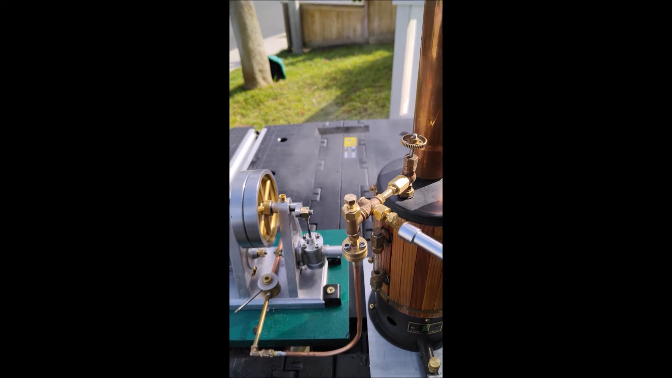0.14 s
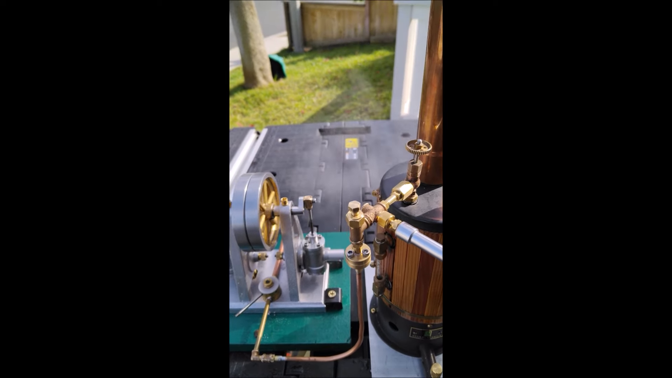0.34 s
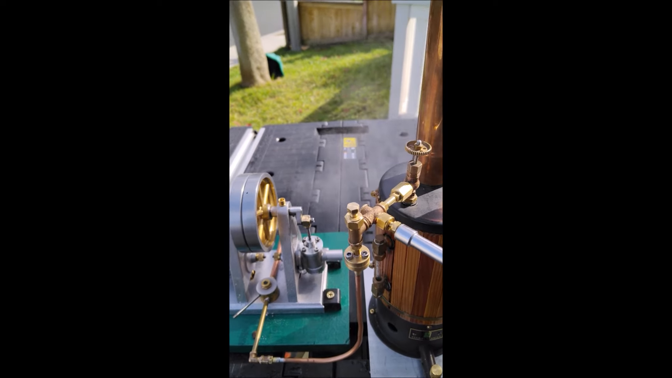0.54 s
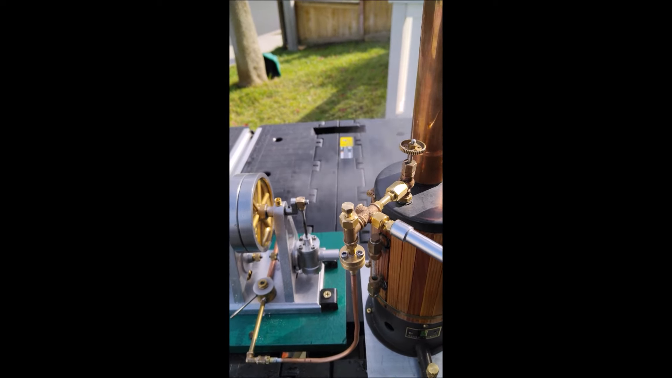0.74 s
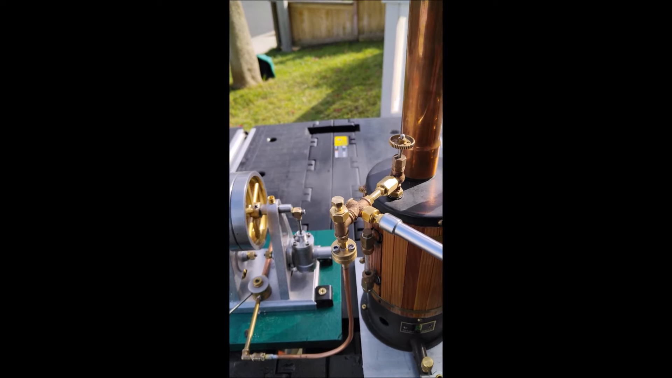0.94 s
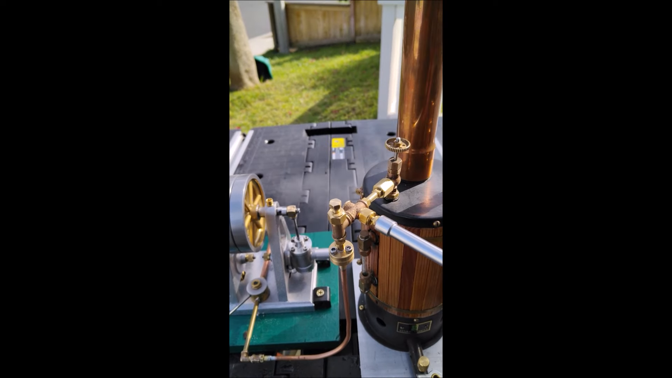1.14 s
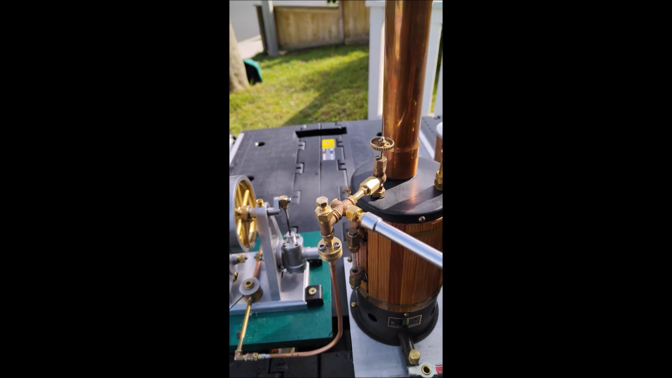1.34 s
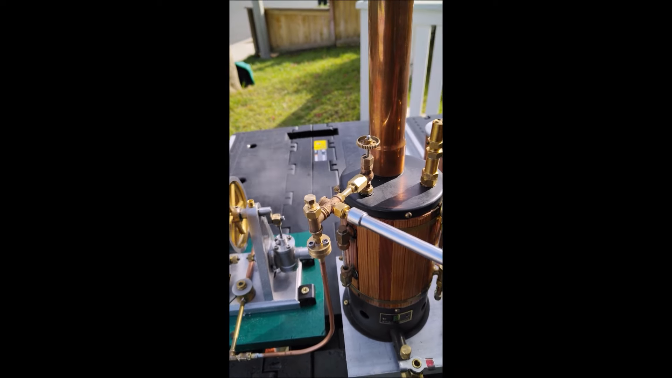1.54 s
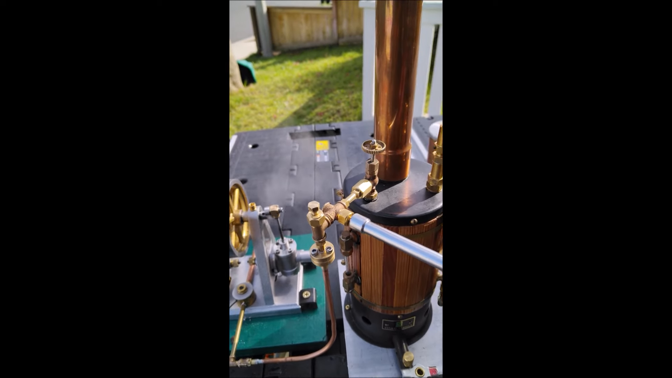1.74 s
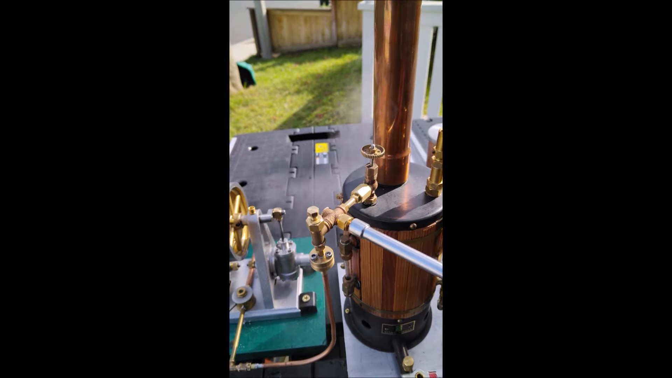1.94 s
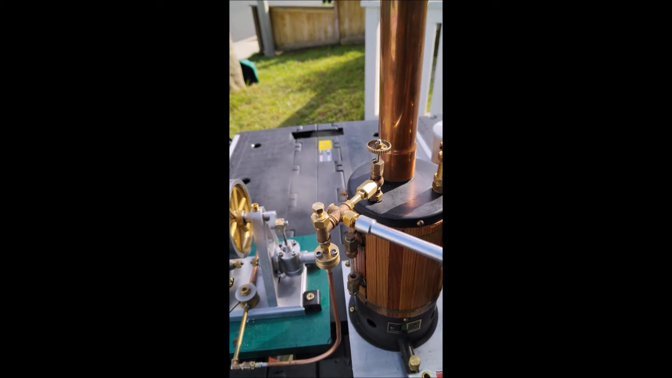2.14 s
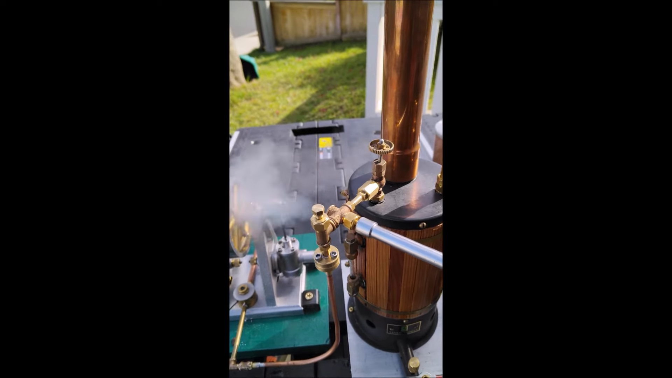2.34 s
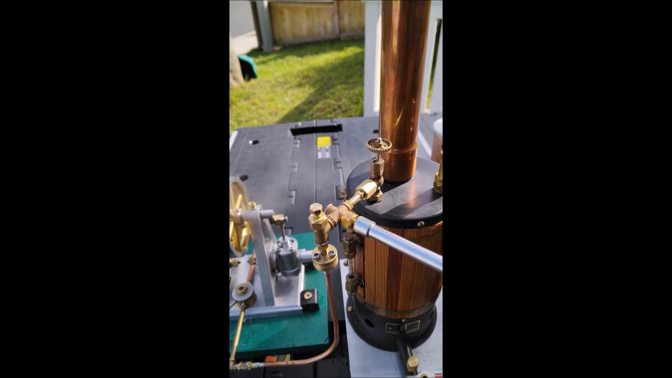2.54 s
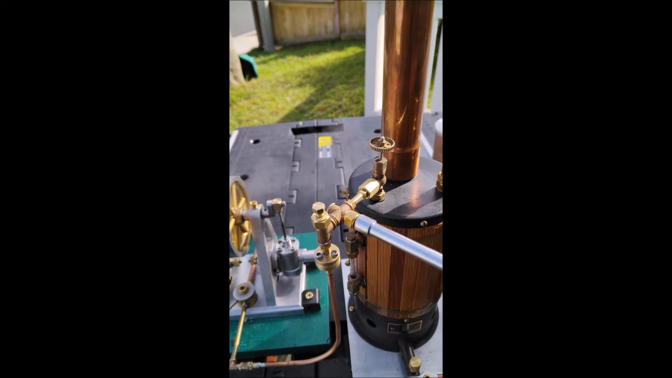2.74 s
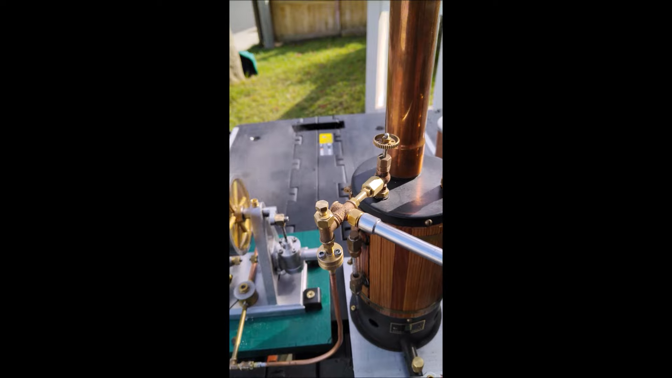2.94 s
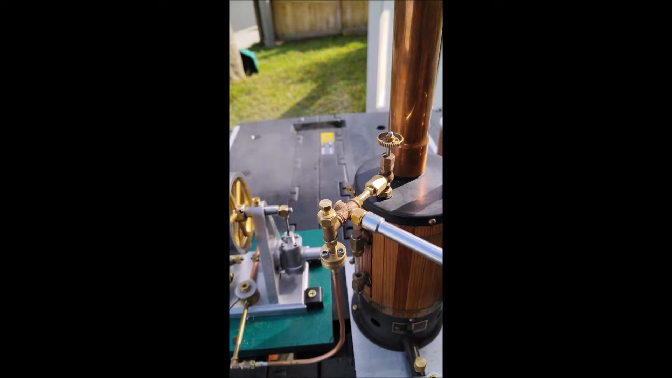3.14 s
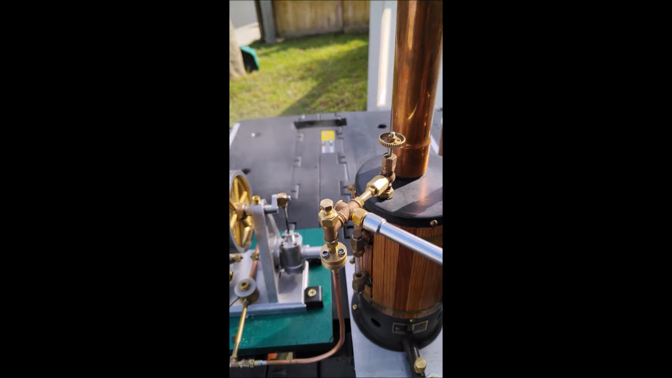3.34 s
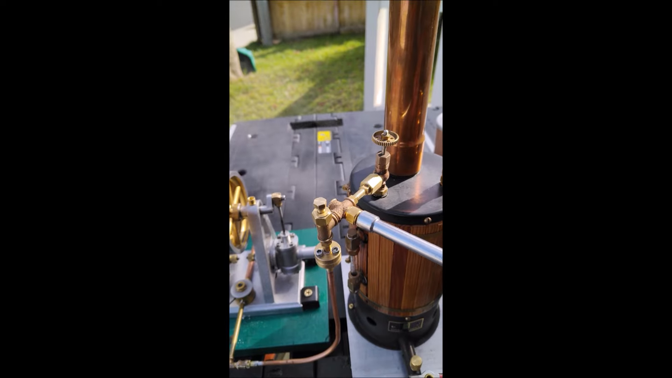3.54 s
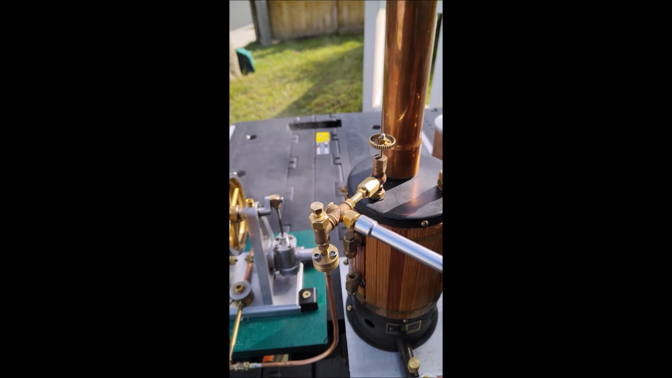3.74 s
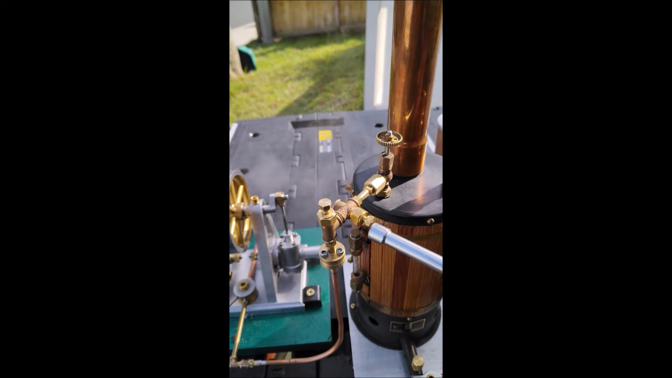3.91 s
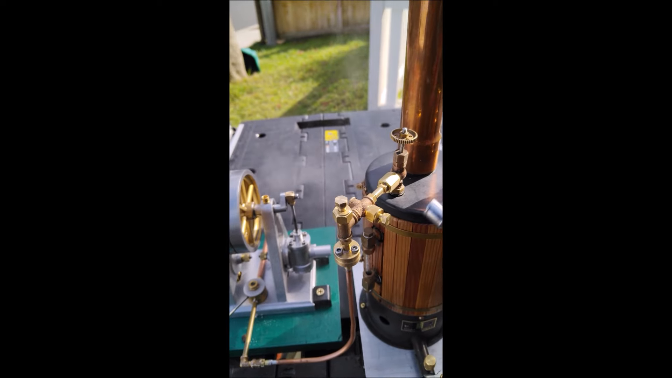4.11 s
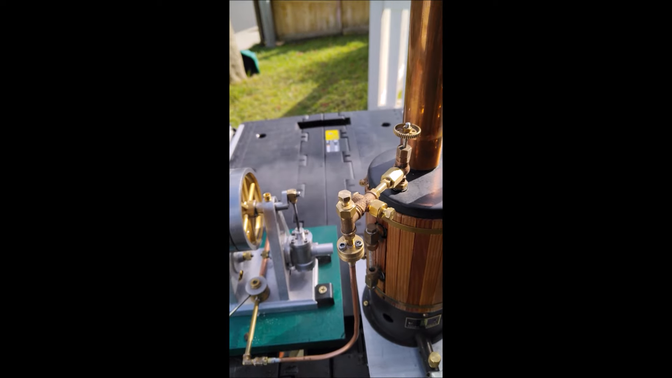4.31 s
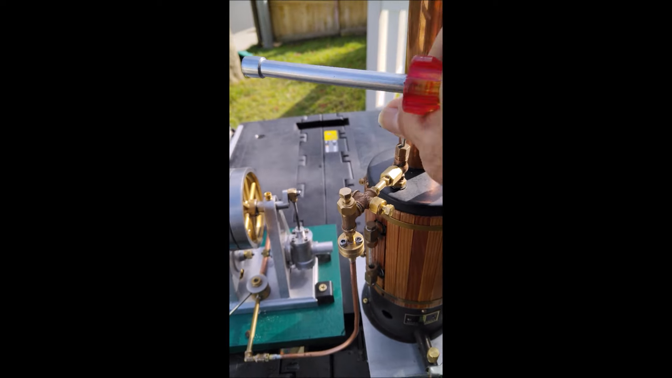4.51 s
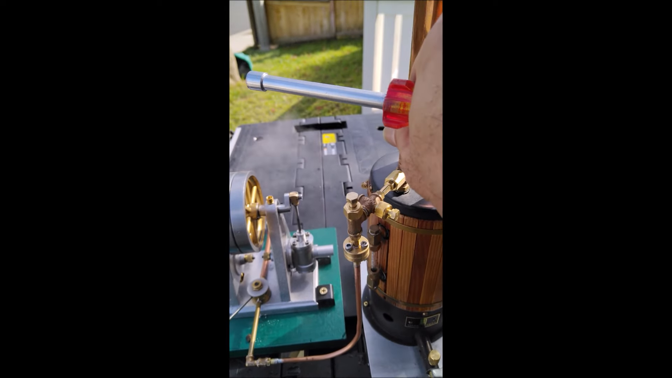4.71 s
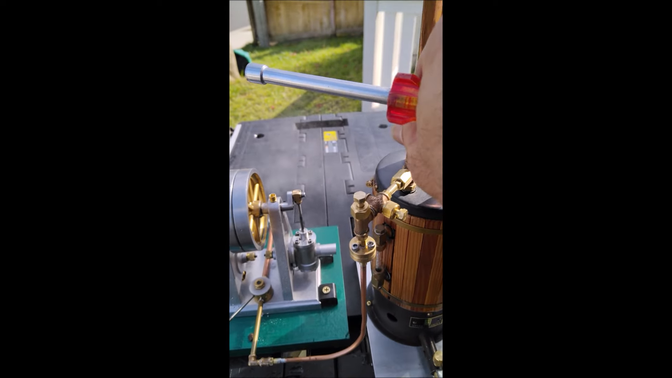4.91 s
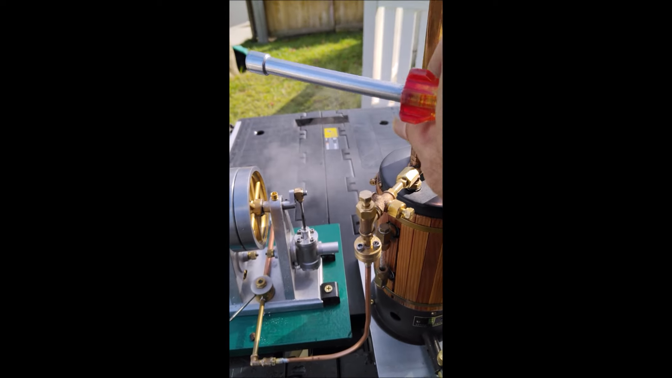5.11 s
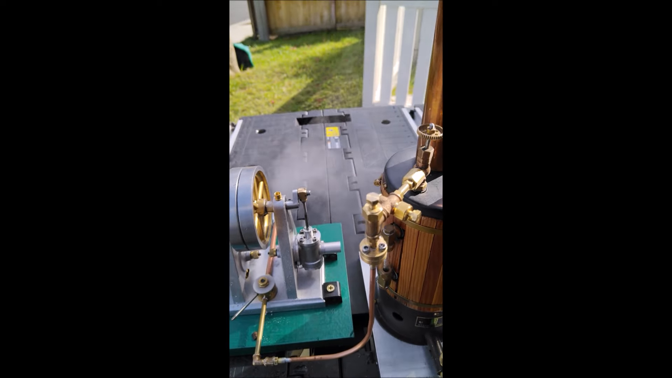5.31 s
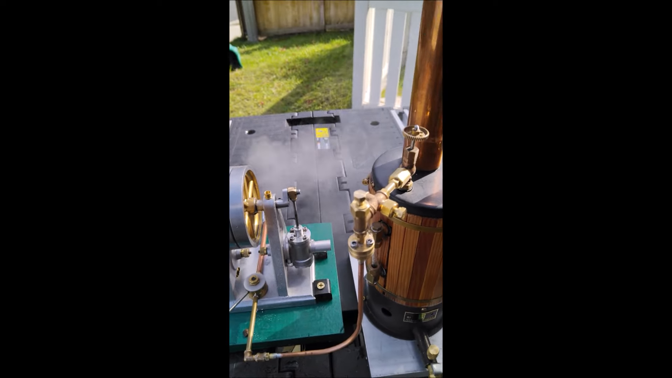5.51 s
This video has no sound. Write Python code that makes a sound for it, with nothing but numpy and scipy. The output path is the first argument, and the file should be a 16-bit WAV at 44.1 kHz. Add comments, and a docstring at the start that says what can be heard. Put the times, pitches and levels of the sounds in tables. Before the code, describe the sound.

A small model steam engine puffs quickly, stalls in a loud burst of hissing steam, then sputters and leaks with a softer hiss.

```python
"""A model steam engine ticks over on a garden table, above a low outdoor rumble: each piston stroke
releases a turbulent puff, coloured by the resonances of the exhaust pipe and copper chimney. At 2.2 s
a jet of wet steam bursts from the cylinder on the left, spray patters down and the engine stalls.
From 3.3 s steam seeps and sputters through condensed water, and a pinhole fizzes. A soft knock rings
the table at 3.9 s, followed by a faint hum. At 5 s a leak swells into a second hiss; one more knock falls."""
import sys
import numpy as np
from scipy import signal
from scipy.fft import rfft, irfft, next_fast_len
from scipy.io import wavfile
from scipy.ndimage import uniform_filter1d, map_coordinates

SR = 44100
rng = np.random.default_rng(int(sys.argv[2]) if len(sys.argv) > 2 else 0)


def store_pcm(level_fs):
    """Save levels as 16-bit WAV."""
    pcm = np.round(np.clip(level_fs, -1, 1) * 32767).astype(np.int16)
    wavfile.write(sys.argv[1], SR, np.atleast_2d(pcm).T)


N = 249606
STALL_S, JET_END_S = 2.3, 3.351


def amp(db):
    """Amplitude ratio of a level in decibels."""
    return 10 ** (np.asarray(db) / 20)


def unit(x):
    """Normalisation to rms 1."""
    return x / np.sqrt(np.mean(x ** 2) + 1e-20)


def since(start):
    """Seconds elapsed since start, zero before it."""
    return np.maximum(np.arange(N) / SR - start, 0)


def ramp(start, length):
    """Linear rise from 0 to 1, beginning at start."""
    return np.minimum(since(start) / length, 1)


def between(start, end, fade):
    """Gate with equal-power fades centred on start and end."""
    t = np.arange(N) / SR
    return np.sqrt(np.clip(np.minimum(t - start, end - t) / fade + .5, 0, 1))


def along(points, hz, column=1):
    """Interpolation of a spectrum table on a logarithmic frequency axis."""
    table = np.transpose(points)
    return np.interp(np.log(hz + 1), np.log(table[0] + 1), table[column])


def curves(rows):
    """Linear interpolation in time: one curve for each column after the first."""
    times, *columns = np.transpose(rows)
    return [np.interp(np.arange(N) / SR, times, column) for column in columns]


def wobble(rate):
    """Smooth random modulation: a spline through rate Gaussian knots a second."""
    knots = rng.standard_normal(int(N * rate / SR) + 4)
    coarse = np.arange(0, N + 8, 8)
    return np.interp(np.arange(N), coarse, map_coordinates(knots, [coarse * rate / SR]))


def add(track, s, sound):
    """Superposition of a sound on a track from time s."""
    start = max(round(s * SR), 0)
    track[start:start + len(sound)] += sound[:N - start]


def gusts(rows, attack):
    """Envelope of brief releases: each opens quickly, then decays as its pressure is spent."""
    t, flow = np.arange(SR) / SR, np.zeros(N)
    for s, db, life in rows:
        add(flow, s, amp(db) * (1 - np.exp(-t / attack)) * np.exp(-(t / life) ** 2))
    return flow


def filtered(x, response):
    """Linear filtering: the spectrum is multiplied by a frequency response."""
    size = next_fast_len(N + SR // 2)
    return irfft(rfft(x, size) * response(np.fft.rfftfreq(size, 1 / SR)), size)[..., :N]


def brighten(x, tilt_db, pivot_hz):
    """Spectral tilt: the band above the pivot gains tilt_db and the band below loses as much."""
    high = filtered(x, lambda hz: np.clip(np.log2((hz + 1) / pivot_hz) / 2 + .5, 0, 1))
    return high * amp(tilt_db) + (x - high) * amp(-tilt_db)


# reflections off boiler, table and railing: (left base delay [s], right base delay [s], relative level [dB])
REFLECTIONS = [(.0013, 0.0012, 0.5), (.0029, 0.0017, 10), (.0041, 0.0039, -1), (.0068, 0.0042, 10.5)]
def comb(hz, echo_db, reach):
    """Comb filtering: direct sound interferes with short echoes, whose paths are scaled by reach."""
    echoes = sum(amp(echo_db + db) * np.exp(-2j * np.pi * hz * reach * np.array([[left], [right]]))
                 for left, right, db in REFLECTIONS)
    # small round surfaces reflect little bass and scatter the treble
    return 1 + echoes * hz / (hz + 1500) / (1 + (hz / 11000) ** 2)


# likeness of left and right: (frequency [Hz], correlation [ratio])
COHERENCE = [(30, 0.49), (70, 0.88), (300, 0.73), (800, 0.74), (1900, 0.68), (3600, 0.62), (5800, 0.56),
             (8000, 0.38), (15000, 0.39)]
def hiss(spectrum, echo_db, grain_db, reach=1, lag=.00006):
    """Turbulent noise of mid rms 1, partly coherent and grainy with droplets; the left is lag s late."""
    size = next_fast_len(N + 2048, True)
    hz = np.fft.rfftfreq(size, 1 / SR)
    grid = hz[::32]
    grainy = rng.standard_normal((2, N)) * amp(grain_db * wobble(900))
    mid, side = rfft(grainy.astype(np.float32), size)
    spread = np.arccos(np.clip(along(COHERENCE, grid), -1, 1)) / 2
    mid = mid * np.interp(hz, grid, np.cos(spread))
    side = side * np.interp(hz, grid, np.sin(spread))
    left, right = amp([along(spectrum, grid, 1), along(spectrum, grid, 2)]) * comb(grid, echo_db, reach)
    left = left * np.exp(-2j * np.pi * grid * lag)
    spectra = np.array([(mid + side) * np.interp(hz, grid, left),
                        (mid - side) * np.interp(hz, grid, right)])
    ears = irfft(spectra, size)[:, :N]
    return ears / np.std(ears.mean(axis=0))


def whistle(centre_hz, width_hz, pan_db):
    """Narrow-band noise of mid rms 1: turbulence drives one resonance. Positive pan_db is to the left."""
    noise = rng.standard_normal((2, 2, N)) + rng.standard_normal((2, 1, N))  # half common to both sides
    in_phase, quadrature = filtered(noise, lambda hz: 1 / (1 + (hz / width_hz) ** 3))
    lag_s = np.array([[.00005], [0]])
    phase = 2 * np.pi * (np.cumsum(centre_hz * np.ones(N)) / SR - centre_hz * lag_s)
    ears = (in_phase * np.cos(phase) + quadrature * np.sin(phase)) * amp([[pan_db / 2], [-pan_db / 2]])
    return ears / np.std(ears.mean(axis=0))


def reflected(pair, echo_db, delay, drift, sway_per_s):
    """An echo whose delay wanders by about drift seconds; its interference shifts a hiss's colour."""
    clock = np.arange(N)
    treble = filtered(pair, lambda hz: hz / (hz + 1500))
    echoes = [np.interp(clock - (delay + drift * wobble(sway_per_s)) * SR, clock, ear) for ear in treble]
    return amp(echo_db) * np.array(echoes)


def eddies(x, depth_db):
    """Turbulent modulation: patches of the spectrum swell and sink, each for a moment."""
    spectrogram = signal.stft(x, nperseg=512)[2]
    patches = uniform_filter1d(rng.standard_normal(spectrogram.shape), size=2, axis=1)
    patches = uniform_filter1d(patches, size=24, axis=2)
    gain = unit(amp(depth_db * np.minimum(unit(patches), 1)))
    return signal.istft(spectrogram * gain, nperseg=512)[1][:, :N]


# one puff for each piston stroke: (time [s], relative level [dB], decay time [s])
STROKES = [(-.005, -36, 0.041), (.068, -38, 0.059), (.152, -36, 0.062), (.24, -34, 0.04),
           (.328, -36.5, 0.088), (.406, -40.5, 0.077), (.495, -36, 0.051), (.588, -35.5, 0.058),
           (.674, -37, 0.079), (.761, -36.5, 0.066), (.845, -35, 0.06), (.934, -36, 0.056),
           (1.02, -34, .055), (1.099, -38.5, 0.09), (1.19, -39, 0.054), (1.276, -37, 0.032),
           (1.364, -35.5, 0.049), (1.443, -39, 0.074), (1.52, -39.5, 0.068), (1.606, -36, 0.037),
           (1.692, -37.5, 0.086), (1.766, -38, 0.11), (1.845, -40, 0.062), (1.93, -37.5, 0.043),
           (2.014, -38, 0.055), (2.088, -39, 0.067), (2.172, -38.5, 0.044)]
# exhaust pipe resonances: (frequency [Hz], width [Hz], relative level [dB], left over right [dB])
EXHAUST_MODES = [(4800, 130, -10, -15), (5480, 96, -19, 7), (5960, 76, -17, -17), (7040, 82, -22, -10)]
# spectra of chimney, exhaust and piston gland: (frequency [Hz], left level [dB], right level [dB])
CHIMNEY_SPECTRUM = [(100, -40, -38), (284, -18.5, -16.5), (377, -29, -28.5), (570, -15.0, -16.5),
                    (766, -21, -19.5), (1130, -15.0, -12), (1310, -29, -24.5), (1350, -25, -11),
                    (1430, -22, -27.5), (1590, -10.5, -8.5), (1740, -6.5, -12), (1980, -3, -6),
                    (2115, -17.0, -13.5), (2380, -10, -16), (2750, -10, -2), (3050, 0.0, -2.0),
                    (3150, -8.5, -0.5), (3500, -4, -17), (4430, -45, -49.0)]
EXHAUST_SPECTRUM = [(2970, -61, -47), (3810, -25.5, -21.0), (4140, -27, -6.5), (4720, -25.0, -7),
                    (5360, -8.5, -6.5), (5770, -3, -2.5), (5640, -14, -11.5), (6200, -11.0, -0.5),
                    (6450, -20.0, -18), (6560, -21, -4.5), (6730, -29, -2), (6740, -18, -15),
                    (7160, -22, -2.5), (7470, -27.5, -17.5), (7800, -17, -13), (9600, -37, -46)]
GLAND_SPECTRUM = [(7300, -44, -45.0), (8330, -6.5, -18), (8730, -9.0, -25), (9260, -0.5, -18),
                  (9300, -4, -30), (10200, -6, -16), (10340, 0.5, -13.5), (10540, -4.5, -23),
                  (11600, -6.5, -24.5), (13250, -2.5, -6), (13900, -7, -18), (13700, -13, -23.5),
                  (14600, -0.5, -18.5), (15120, -14, -27), (15600, -21, -22)]
def engine():
    """Pulsed flow: each stroke excites chimney and exhaust and leaks at the gland, over steady blow-by."""
    puff = gusts(STROKES, attack=0.005) * amp(1.5 * wobble(70))  # the valve flutters within each puff

    def flow(steady_db, puff_db):
        """Blow-by and puffs add in power."""
        return np.hypot(amp(steady_db) * between(-1, STALL_S, fade=0.25), amp(puff_db) * puff)

    chimney = hiss(CHIMNEY_SPECTRUM, echo_db=-14, grain_db=1.1, reach=1.3)
    modes = sum(amp(db) * whistle(hz, width, pan) for hz, width, db, pan in EXHAUST_MODES)
    exhaust = modes + hiss(EXHAUST_SPECTRUM, echo_db=-12, grain_db=0.9, reach=1.1)
    gland = hiss(GLAND_SPECTRUM, echo_db=-3, grain_db=0.7, reach=.8, lag=0.000254)
    gland = brighten(gland, tilt_db=-4.5 + 4.5 * since(0), pivot_hz=10000)  # sharpens as the engine runs
    return (flow(steady_db=-56, puff_db=-17) * chimney
            + flow(steady_db=-46.5, puff_db=-7.5) * exhaust
            + flow(steady_db=-51.5, puff_db=-13.5) * gland)


# course of the outdoor rumble: (time [s], level [dB])
RUMBLE_LEVEL = [(0, -77.5), (.5, -74), (1.2, -76.5), (1.7, -77), (2.2, -81), (2.6, -72), (2.72, -71),
                (2.84, -67.5), (2.95, -70.5), (3.8, -78), (4.4, -76.5), (4.75, -76.5), (5.4, -78)]
# its spectrum: (frequency [Hz], left level [dB], right level [dB])
RUMBLE_SPECTRUM = [(20, -22, -26), (45, -10, -1), (82, 4.5, 2), (129, 0, 5), (181, -5, -6), (274, -4, -5),
                   (467, -13.5, -18), (1100, -16, -34), (4000, -69, -44)]
def garden():
    """Ambient noise: a low outdoor rumble of slowly fluctuating level."""
    rumble_db, = curves(RUMBLE_LEVEL)
    return amp(rumble_db + 1.9 * wobble(15)) * hiss(RUMBLE_SPECTRUM, echo_db=-23, grain_db=-2)


# spectrum of the idle chimney: (frequency [Hz], left level [dB], right level [dB])
IDLE_SPECTRUM = [(150, -66.5, -59), (534, -23, -22.5), (1430, -25, -20), (1570, -15, -17.5),
                 (1664, -8.5, -13), (1872, -1, -9), (2205, -15.5, -11), (2360, -13, -12.5),
                 (2430, -6.5, -7.5), (2850, -16.5, -7.5), (2987, 1, -4), (3200, -22, -6.5),
                 (3430, -13.5, -18.5), (4400, -42.0, -45)]
def run_down():
    """Exponential decay: as the jet robs the engine of steam, the flow holds briefly, then dies away."""
    hold_s, decay_db_per_s = 0.2, 13
    flow = amp(-decay_db_per_s * since(STALL_S + hold_s))
    chimney = amp(-58.5) * flow * hiss(CHIMNEY_SPECTRUM, echo_db=-9, grain_db=2.5, reach=1.3)
    chimney = chimney + amp(-63) * hiss(IDLE_SPECTRUM, echo_db=-11, grain_db=4, reach=1.3)
    exhaust = amp(-48.5 + 2.6 * wobble(24.64)) * flow
    exhaust = exhaust * hiss(EXHAUST_SPECTRUM, echo_db=-4, grain_db=1.5, reach=1.4)
    return chimney * between(STALL_S, 3.28, fade=0.05) + exhaust * between(2.1, 2.86, fade=0.14)


# spectra of the jet and its landing spray: (frequency [Hz], left level [dB], right level [dB])
JET_SPECTRUM = [(2280, -43, -48), (4000, -28, -27.5), (5000, -27, -19.5), (5700, -21, -19),
                (6330, -28.0, -18.5), (6696, -25, -16), (6850, -18, -10.5), (9070, -13, -12.5),
                (9200, -7.5, -9), (10450, -7.0, -21), (11300, -4.5, -14.5), (12800, 0, -15.0),
                (13820, -9, -9), (14600, 0.5, -14.5), (15200, -10, -11), (15500, -0.5, -9)]
SPRAY_SPECTRUM = [(30, -22, -20), (100, -25, -2), (230, -19, 1.5), (370, -10, 4.5), (696, -23, 0),
                  (1420, -4, 1.5), (3120, -1, -3), (6000, -35, -13.5)]
# larger gobs of water in the spray: (time [s], level [dB], decay time [s])
GOBS = [(2.455, -66, .025), (2.672, -54.5, 0.027), (3.075, -60, 0.036)]
def burst():
    """Jet noise: steam leaves the cylinder, brighter the wider the gap; its spray strikes the table."""
    start_s, crack_s, widen_s, shut_s = 2.181, 0.097, 0.29, 0.18
    opening = ramp(start_s, crack_s) ** 2 * (1 - ramp(JET_END_S - shut_s, shut_s)) ** 1.9
    opening = opening * amp(-6.5 * (1 - ramp(start_s, widen_s)))
    jet_db = -23.5 - 3 * since(start_s + widen_s) + 0.22 * wobble(60)  # sags as the pressure falls
    jet = hiss(JET_SPECTRUM, echo_db=-9.5, grain_db=0.3, reach=1.5, lag=0.000181)
    # the plume wavers beside the flywheel
    jet = jet + reflected(jet, echo_db=-8.5, delay=.0011, drift=.00008, sway_per_s=3.5)
    jet = opening * amp(jet_db) * brighten(jet, tilt_db=3 - 12.5 * (1 - opening) ** 2, pivot_hz=12800)
    land_s, rise_s, thinning_db_per_s = 2.32, 0.16, 12
    spray_db = -58.5 - thinning_db_per_s * since(land_s + rise_s) + 0.72 * wobble(40)
    spray = np.hypot(amp(spray_db) * ramp(land_s, rise_s), gusts(GOBS, attack=0.0018))
    spray = spray * hiss(SPRAY_SPECTRUM, echo_db=-19, grain_db=4, lag=0.00055)
    drips = amp(-4) * (1 - ramp(JET_END_S, 1))  # some spray still lands after the jet is shut
    return jet + spray * np.maximum(np.sqrt(opening), drips)


# flares of the exhaust pipe's note, and soft swells in the chimney: (time [s], level [dB], decay time [s])
PIPE_FLARES = [(3.1, -62, .3), (3.36, -54, 0.07), (3.56, -52, .06), (4.165, -54, 0.44), (5.19, -50, .35)]
SWELLS = [(3.375, -50, .055), (3.93, -60.5, 0.1), (4.97, -59.5, 0.48), (5.36, -55, 0.31)]
# spurts of wet steam: (time [s], relative level [dB], decay time [s], pinhole fizz level [dB])
SPURTS = [(3.36, -54, 0.2, -52.5), (3.575, -55, 0.046, -58), (3.622, -67, 0.12, -55.5),
          (3.8, -72, 0.066, -56.5), (4.46, -53, 0.046, -51.5)]
# spectrum of the seeping steam: (frequency [Hz], left level [dB], right level [dB])
SEEP_SPECTRUM = [(3100, -36, -40), (3670, -17, -9), (3890, -17.5, -24), (4400, -6, -6.5),
                 (4450, -20, -10.5), (4950, -26, -2), (5270, -8, -20), (5630, -18, -1), (5710, -11.5, -9.5),
                 (5770, -11, -12), (5980, -15, -3.5), (6900, -13.0, -5.5), (6930, -44, -3), (7350, -17, -8),
                 (9150, -46.0, -28)]
def seepage():
    """Flow-driven resonance: steam sputters through condensed water in the pipe, louder with pressure."""
    pressure_db = 9.5 * since(4.113)  # builds again behind the stalled piston
    sputter = wobble(130)
    spurt = gusts([(s, db, life) for s, db, life, _ in SPURTS], attack=0.021)
    chimney = np.hypot(amp(-63 + 0.45 * pressure_db), amp(-20) * spurt) * amp(sputter)
    chimney = chimney * hiss(IDLE_SPECTRUM, echo_db=-11.5, grain_db=-1.5, reach=1.3)
    seep = np.hypot(amp(-60 + pressure_db), amp(4) * spurt) * amp(.5 * sputter)
    seep = seep * hiss(SEEP_SPECTRUM, echo_db=-3.5, grain_db=1.5, reach=0.96)
    note = np.hypot(amp(-62.5 + 0.47 * pressure_db), gusts(PIPE_FLARES, attack=0.0097))
    note = note * amp(0.4 * sputter) * whistle(centre_hz=4805, width_hz=113, pan_db=-20)
    spits = amp(-5) * spurt * hiss(EXHAUST_SPECTRUM, echo_db=-13, grain_db=-2, reach=1.7)
    swells = gusts(SWELLS, attack=0.04) * hiss(CHIMNEY_SPECTRUM, echo_db=3, grain_db=-2, reach=3)
    return ((chimney + seep) * between(3.327, 7, fade=0.1)
            + note * between(STALL_S, 7, fade=.2) + spits + swells)


# spectrum of the pinhole's fizz: (frequency [Hz], left level [dB], right level [dB])
FIZZ_SPECTRUM = [(6300, -24, -32), (7840, -8.5, -12.5), (8500, -10, -2.5), (8700, -17, -20),
                 (9000, -5.5, -14), (9950, -4.5, -17), (10380, -3, -17), (12920, 0.5, -7),
                 (13390, -4, -5.0), (14800, -5, -11.0), (14810, -15, -17), (15100, -4.5, -9.5)]
# droplets popping in the hole: (time [s], level [dB], decay time [s])
DROPLET_POPS = [(3.792, -49, 0.0023), (3.843, -48, .002), (4.466, -46, .003), (4.997, -48, .002),
                (5.078, -47, .002)]
# its note, sinking as the hole clears: (time [s], frequency [Hz], level [dB])
PINHOLE_NOTE = [(3.3, 11100, -67.5), (3.42, 10800, -59), (3.7, 11100, -64), (4.1, 11240, -77),
                (4.55, 11100, -69), (4.72, 10970, -59.5), (4.95, 10630, -62), (5.1, 10670, -52.5),
                (5.4, 10620, -53)]
def pinhole():
    """Orifice noise: wet steam fizzes, pops and whistles through a pinhole, its colour wandering."""
    spurt = gusts([(s, fizz_db, life) for s, _, life, fizz_db in SPURTS], attack=0.012)
    steady = amp(-58.5 + 0.5 * since(JET_END_S) + 1.1 * wobble(6.37))
    flow = np.hypot(steady, spurt) * amp(0.46 * wobble(92))
    flow = np.hypot(flow, gusts(DROPLET_POPS, attack=.0003))
    fizz = hiss(FIZZ_SPECTRUM, echo_db=-10, grain_db=1.5, reach=0.83, lag=0.00034)
    fizz = flow * brighten(fizz, tilt_db=-5.5 * wobble(4.62), pivot_hz=11400)
    note_hz, note_db = curves(PINHOLE_NOTE)
    note = amp(note_db) * whistle(centre_hz=note_hz, width_hz=220, pan_db=20)
    return (fizz + note) * between(3.27, 5.4, fade=0.1)


# soft blows: (time [s], relative level [dB], bass loss below 1 kHz [dB/octave], attack [s])
BLOWS = [(3.897, -55.5, -7, 0.002), (5.451, -52.5, 18, 0.0075)]
# modes of the table: (frequency [Hz], relative level [dB], time to fall 60 dB [s])
TABLE_MODES = [(447, -3.5, 0.071), (600, -8, 0.099), (806, -1, 0.054), (990, -10, 0.041), (1094, 1, 0.11),
               (1360, -6, 0.086), (1960, 9, 0.054)]
# spectrum of the contact's thud: (frequency [Hz], left level [dB], right level [dB])
THUD_SPECTRUM = [(250, -30, -30), (420, -6, 3), (650, -5, 5), (1100, -5, 2), (1780, 2, 2), (3000, -31, -25)]
def knocks():
    """Impact excitation: two blows thud and ring the table's damped modes, the first fuller in the bass."""
    gain_db = -6.5
    t, ringing = np.arange(SR // 4) / SR, np.zeros(N)
    for s, db, bass_loss, attack in BLOWS:
        for hz, mode_db, t60 in TABLE_MODES:
            level_db = db + gain_db + mode_db + bass_loss * min(np.log2(hz / 1000), 0) + rng.normal(0, 1.3)
            mode = amp(level_db - 60 * t / t60) * np.sin(2 * np.pi * (hz * t + rng.random()))
            add(ringing, s, mode * (1 - np.exp(-t / attack)))
    contact = gusts([(s, db + gain_db, 0.03) for s, db, _, _ in BLOWS], attack=0.0018)
    return ringing + contact * hiss(THUD_SPECTRUM, echo_db=-12, grain_db=2)


# partials of the hum after the first knock: (frequency [Hz], level [dB])
HUM_PARTIALS = [(291, -70.5), (495, -73)]
def hum():
    """Roughness: two faint tones are modulated quickly and at random in amplitude and phase."""
    t = np.arange(N) / SR
    tones = sum(amp(db + 2.5 * wobble(110)) * np.sin(2 * np.pi * hz * t + 0.88 * wobble(90))
                for hz, db in HUM_PARTIALS)
    return tones * between(3.968, 4.055, fade=0.021)


# spectra of the leak, thin and widened: (frequency [Hz], left level [dB], right level [dB])
THIN_SPECTRUM = [(4106, -33, -35), (5140, -3, -10.0), (5560, -22, -9), (6570, -8, -4), (7240, -22.0, -6),
                 (7670, -20.0, -15.0), (7760, -10, -8), (12500, 1, -6.5), (13570, -7, -15.0),
                 (14040, -9, -8.0), (14560, -19.5, -11.5), (15290, -6, -7.5)]
WIDE_SPECTRUM = [(3600, -40, -34), (4440, -20, -25), (4700, -5.5, -8), (4820, -15.0, -7), (5250, -7, -5.5),
                 (5500, -16.0, 1), (6290, -15, -21), (7000, -5.5, -2), (10850, 1.5, -7), (11400, -2, -7),
                 (12900, -12.5, -16.0), (13010, -18, -21), (13440, -4, -18.5), (14510, -14, -16),
                 (15290, -14.5, -9)]
def leak():
    """Jet noise falls in frequency as an aperture grows: a thin, bright leak widens to a duller rush."""
    widening = ramp(start=5.27, length=0.19)
    thin = hiss(THIN_SPECTRUM, echo_db=-10, grain_db=2, reach=1.5, lag=0.000201)
    wide = hiss(WIDE_SPECTRUM, echo_db=-7, grain_db=2.5, reach=1.6, lag=.00007)
    rush = amp(-44.5) * np.sqrt(1 - widening) * thin + amp(-45) * np.sqrt(widening) * wide
    return ramp(start=4.995, length=0.086) * amp(0.22 * wobble(27)) * rush


def scene():
    """Superposition: the eddying steam and its wavering echo add to the knocks, hum and rumble."""
    steam = eddies(engine() + burst() + run_down() + seepage() + pinhole() + leak(), depth_db=3.4)
    echo = reflected(steam, echo_db=-16, delay=.0021, drift=.00007, sway_per_s=2.03)
    return steam + echo + knocks() + hum() + garden()


def record(dry):
    """Band limiting: a steep low-pass filter removes the highest treble."""
    cutoff_hz, edge_hz = 15560, 200
    return filtered(dry, lambda hz: np.clip((cutoff_hz - hz) / edge_hz + .5, 0, 1) ** 2)


dry = scene()
out = record(dry)
store_pcm(out)
```